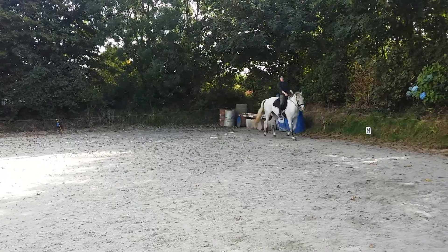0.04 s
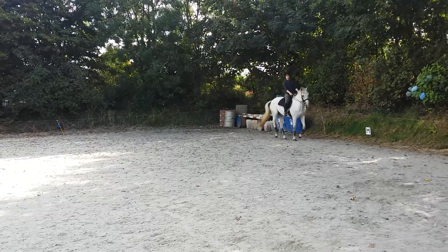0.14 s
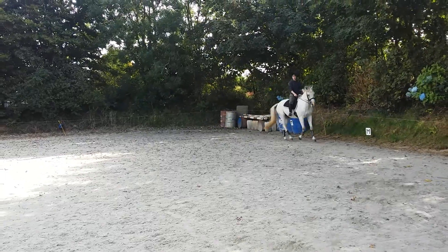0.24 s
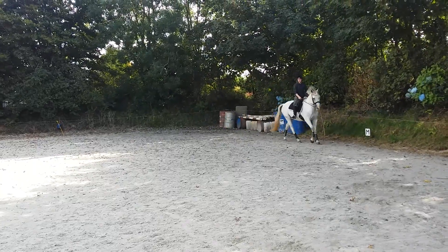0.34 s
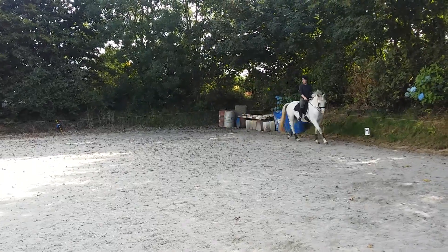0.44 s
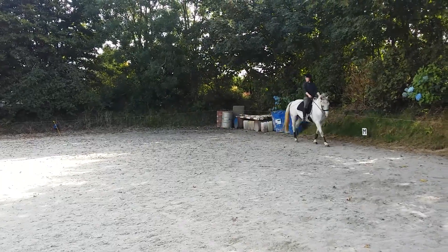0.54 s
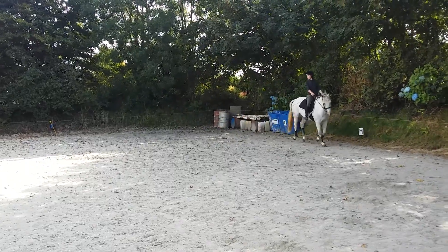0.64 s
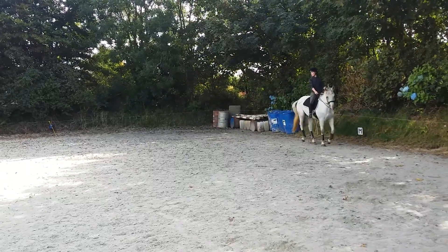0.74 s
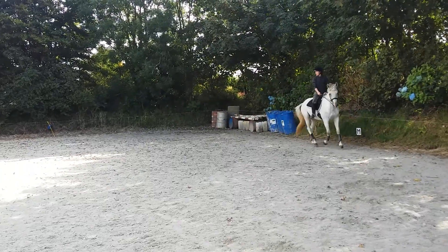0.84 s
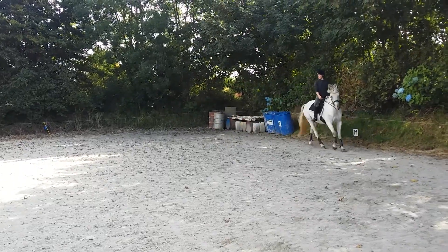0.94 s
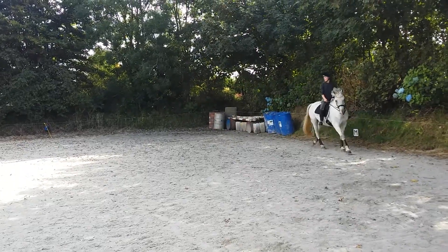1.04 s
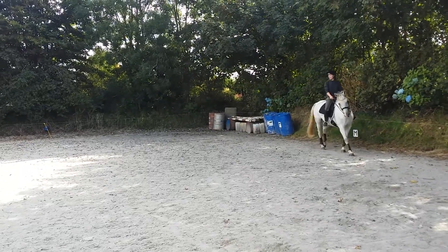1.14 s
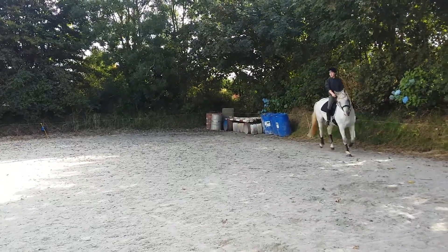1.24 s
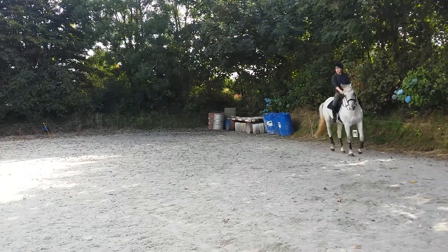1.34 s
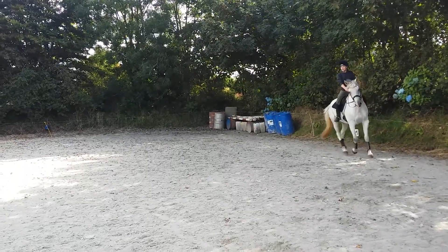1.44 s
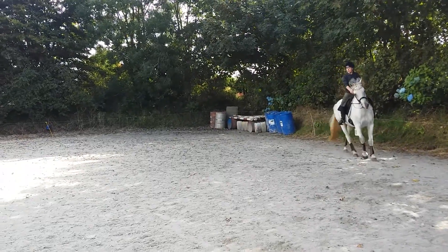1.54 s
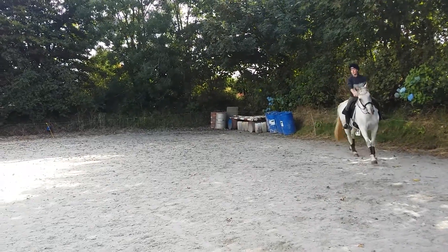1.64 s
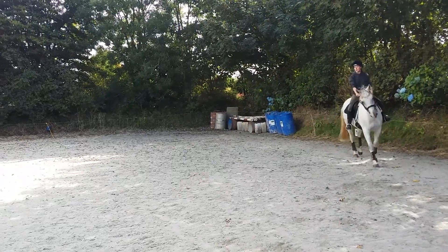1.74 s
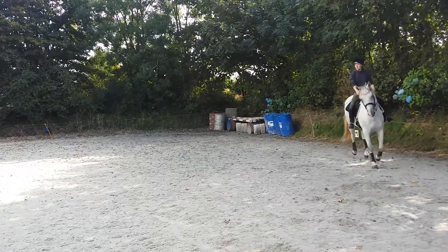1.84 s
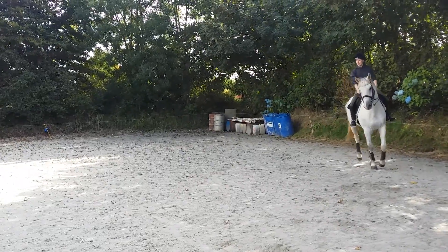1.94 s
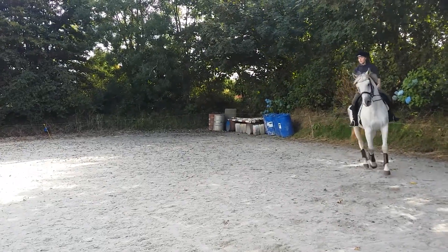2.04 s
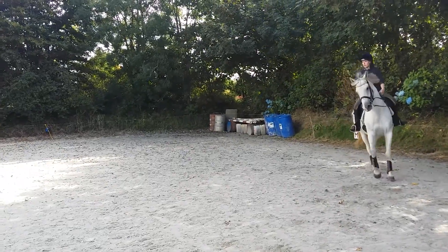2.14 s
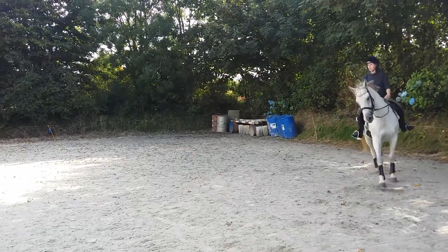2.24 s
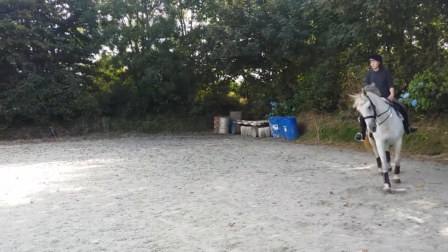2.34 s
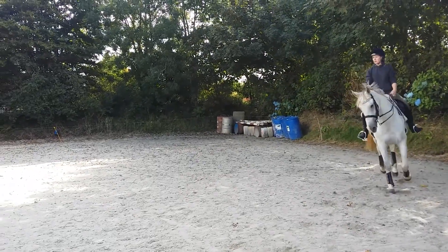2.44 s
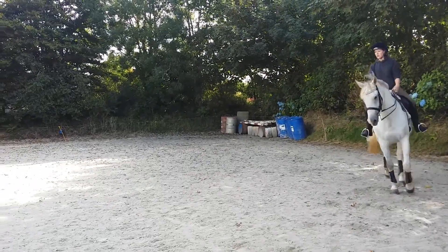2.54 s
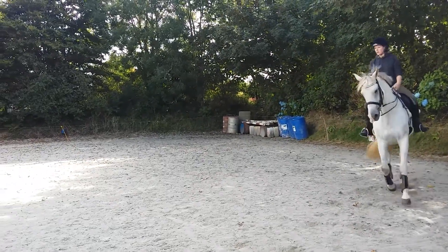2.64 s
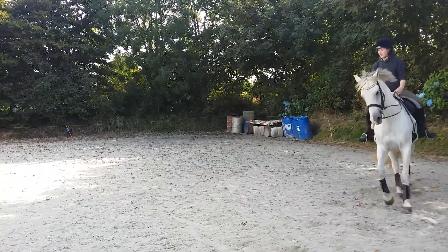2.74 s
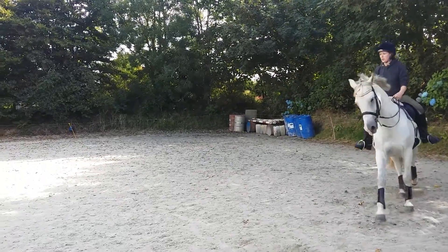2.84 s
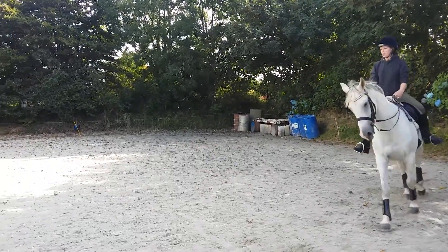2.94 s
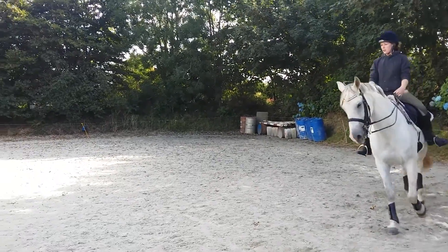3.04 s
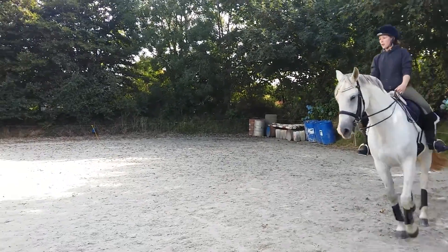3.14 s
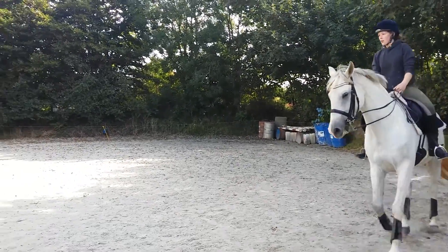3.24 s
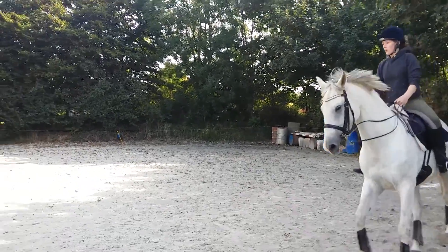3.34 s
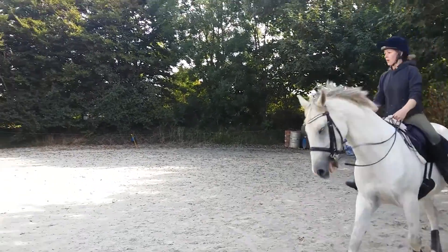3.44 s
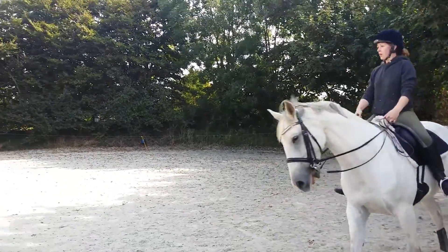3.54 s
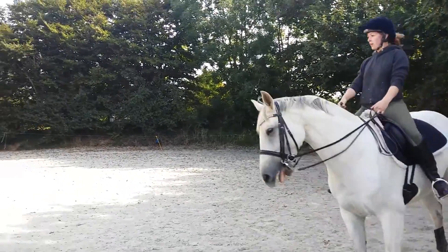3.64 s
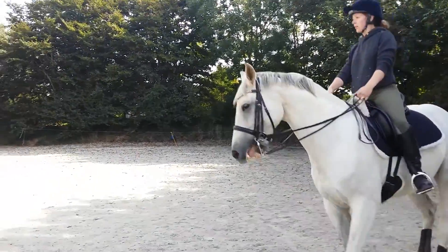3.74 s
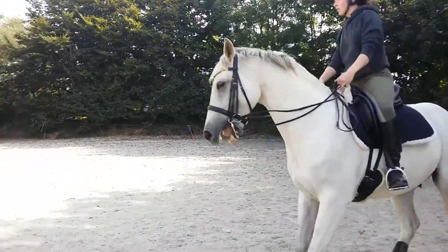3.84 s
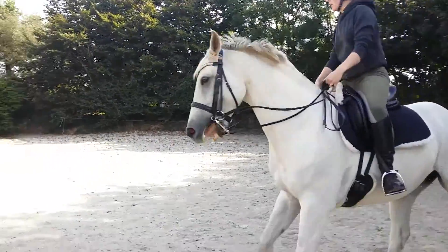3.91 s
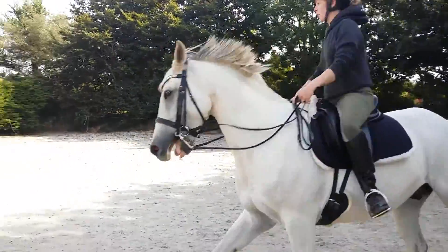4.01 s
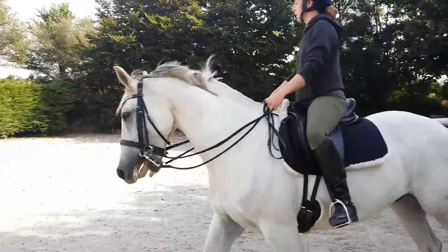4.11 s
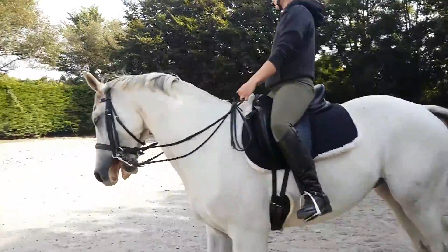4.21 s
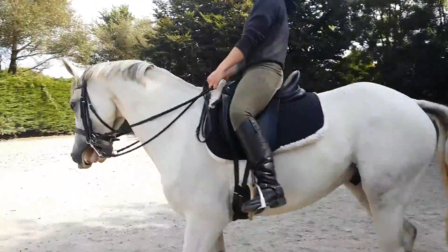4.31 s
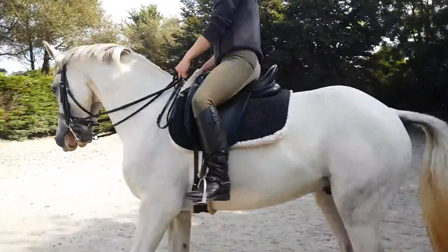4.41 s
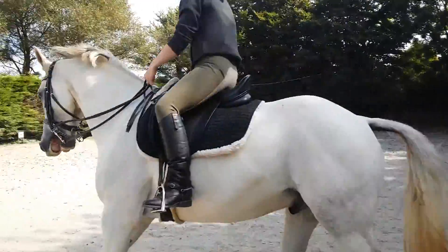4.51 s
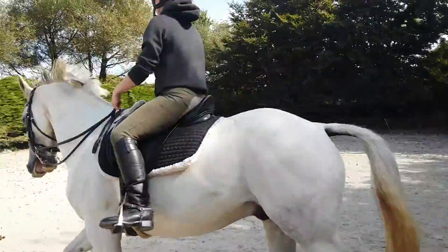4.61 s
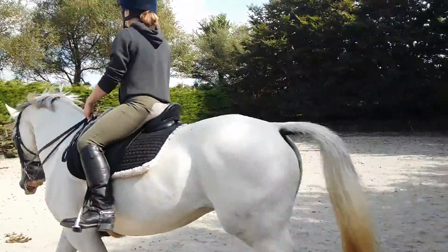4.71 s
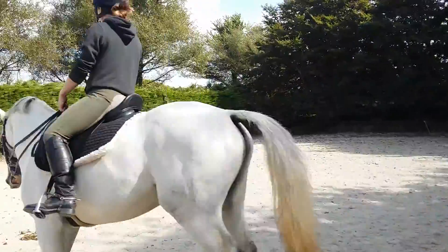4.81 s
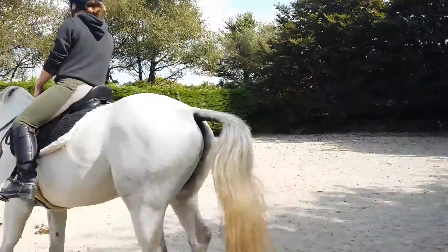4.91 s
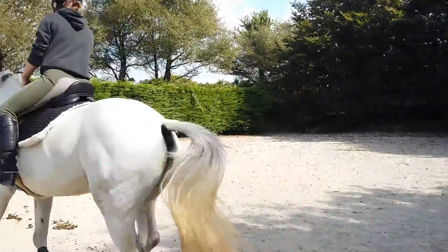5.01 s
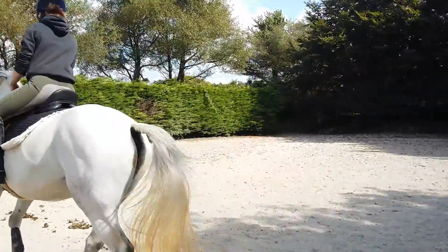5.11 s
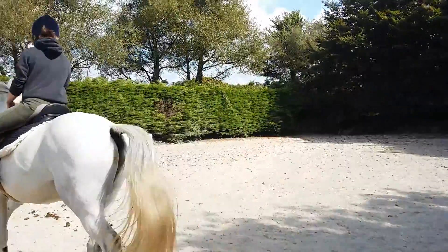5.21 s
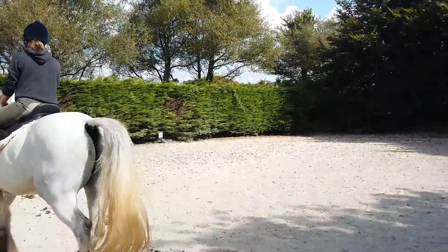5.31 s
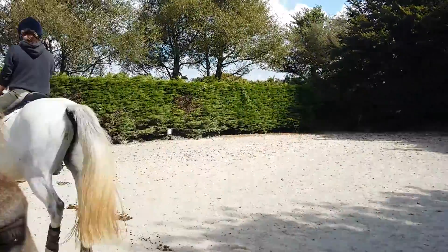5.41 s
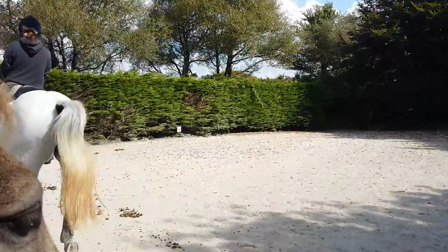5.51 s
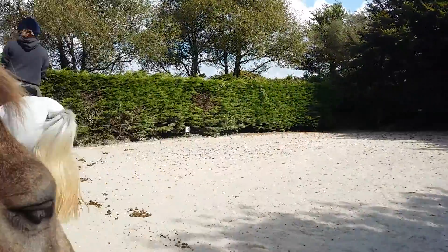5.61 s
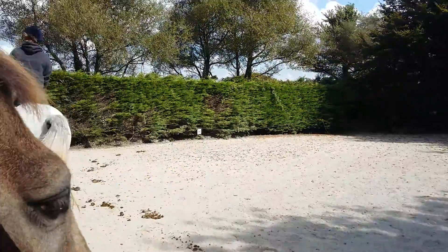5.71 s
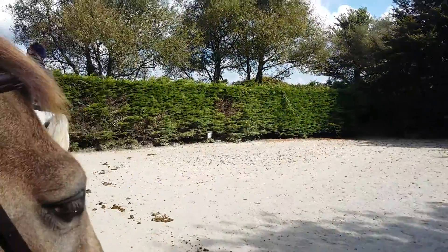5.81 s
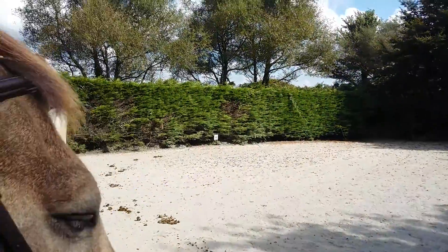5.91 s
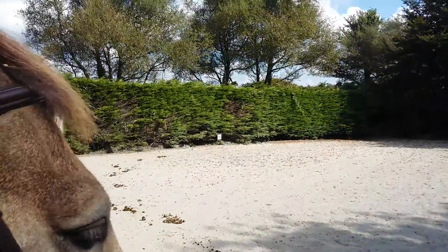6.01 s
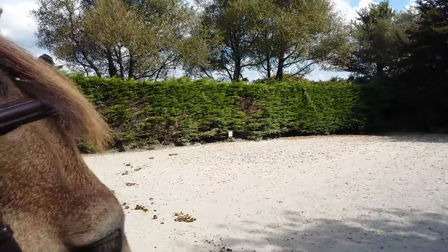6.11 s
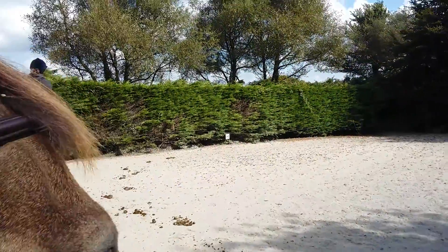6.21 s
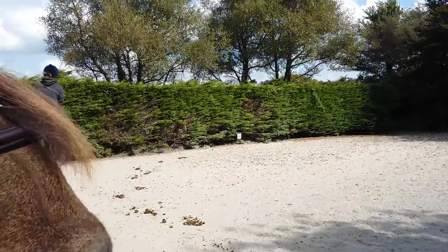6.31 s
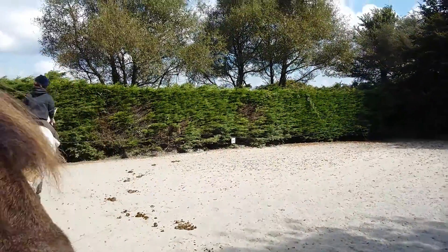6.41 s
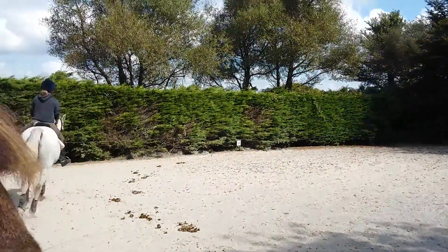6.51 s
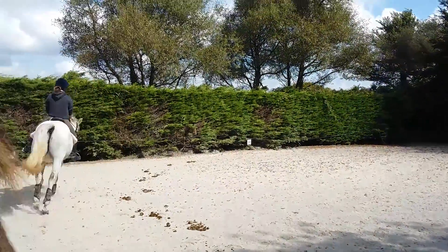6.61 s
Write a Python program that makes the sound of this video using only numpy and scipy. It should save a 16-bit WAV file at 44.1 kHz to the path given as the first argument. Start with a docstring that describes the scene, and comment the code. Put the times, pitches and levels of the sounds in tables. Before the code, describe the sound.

Outdoors on a sand arena ringed by trees, a cantering horse starts faint and distant, its dull hoof thuds and sandy crunches in uneven clusters. It comes steadily nearer, passes very close with hard thumps, spraying grit and small metallic tack ticks, then moves off more softly. Leaves rustle faintly throughout, and wind thumps a small handheld stereo camera's microphones, mostly after the pass.

```python
"""On a sand arena among trees a horse canters up to a small camera and passes it: damped tones make the
hoof thuds, enveloped noise and short damped sines the sand, and clusters of metal modes the tack ticks.
Noise in random patches rustles as leaves; low noise and short low tones are the wind on two microphone
ports. Tables set the levels of blows, crunches and wind; distance also sets the hoof thumps, stray kicks
and the pitch of the clods under crunches and strays."""
import sys
import numpy as np
from scipy import signal
from scipy.fft import rfft, irfft, next_fast_len
from scipy.io import wavfile
from scipy.ndimage import uniform_filter1d, map_coordinates

SR = 44100
rng = np.random.default_rng(int(sys.argv[2]) if len(sys.argv) > 2 else 0)


def wav_record(signal):
    """Record a signal, one row per channel, as 16-bit PCM in the file named by sys.argv[1]."""
    frames = np.transpose(np.atleast_2d(signal))
    bounded = np.clip(frames, -1, 1)
    # unit amplitude maps onto the largest positive 16-bit level
    quanta = np.round(bounded * 32767).astype(np.int16)
    wavfile.write(sys.argv[1], SR, quanta)


N = 293706


def amp(db):
    """Level to amplitude: 20 dB is a factor of ten."""
    return 10 ** (np.asarray(db) / 20)


def unit(x):
    """Normalisation of the whole array to rms 1."""
    return x / np.sqrt(np.mean(x ** 2) + 1e-20)


def along(points, hz):
    """Interpolation of (hz, value) points on a logarithmic frequency axis."""
    point_hz, value = np.transpose(points)
    return np.interp(np.log(hz + 1), np.log(point_hz + 1), value)


def over_time(points):
    """Linear interpolation of (time_s, value) points to one value a sample."""
    return np.interp(np.arange(N) / SR, *np.transpose(points))


def wobble(rate):
    """Random modulation: a smooth curve through normal random knots, rate of them a second."""
    knots = rng.standard_normal(int(N * rate / SR) + 4)
    return map_coordinates(knots, [np.arange(N) * rate / SR])


def filtered(x, response):
    """Linear filtering: the spectrum of x times a response of frequency."""
    m = next_fast_len(N + SR // 4)
    return irfft(rfft(x, m) * response(np.fft.rfftfreq(m, 1 / SR)), m)[..., :N]


def spread(pair, spectrum):
    """Interaural-style coherence: mid and side are weighted so the ports correlate as a wide source."""
    # left-right correlation by frequency: hz, correlation
    likeness = [(60, 0.68), (110, 0.97), (200, 0.9), (380, 0.82), (700, 0.6), (1290, 0.072), (2380, 0.02),
                (4400, 0.17), (8120, 0.01), (15000, 0.0)]

    def mid_side(hz):
        angle = np.arccos(np.clip(along(likeness, hz), -1, 1)) / 2
        return amp(along(spectrum, hz)) * [np.cos(angle), np.sin(angle)]

    mid, side = filtered(pair, mid_side)
    return np.array([mid + side, mid - side]) / np.std(mid)


def grains(spiky_db, rate):
    """Granular noise: two noise streams share a random size that varies from grain to grain."""
    size = amp(spiky_db * wobble(rate))
    return size * rng.standard_normal((2, N))


def patches(depth_db, size, wide, long):
    """Time-frequency modulation: noise gains random patches, wide bins by long frames of an STFT."""
    bins = signal.stft(rng.standard_normal((2, N)), nperseg=size)[2]
    field = rng.standard_normal(bins.shape[1:])
    field = uniform_filter1d(uniform_filter1d(field, wide, 0), long, 1)
    return signal.istft(bins * amp(depth_db * unit(field)), nperseg=size)[1][:, :N]


def swell(s, rise, fall, bend):
    """Transient envelope, 8 dB down rise s before and fall s after its peak; also its start index."""
    t = np.arange(-SR // 8, SR // 5) / SR
    shape = amp(-8 * np.where(t < 0, (np.abs(t) / rise) ** 2.1, (np.abs(t) / fall) ** bend))
    return round(s * SR) + SR - SR // 8, shape  # the buffers begin 1 s early


def metres(s):
    """Source distance, interpolated along the path of the horse."""
    # path past the camera: time_s, distance_m
    path = [(0, 29), (1.5, 16.7), (2.8, 8.8), (3.8, 5.2), (4.5, 4.2), (5.3, 4.4), (6.66, 11.5)]
    return np.interp(s, *np.transpose(path))


def hooves():
    """Impulsive excitation: packed ground rings as a damped tone, and loose sand adds a dull noise puff."""
    # blows on packed sand: peak_s, level_db, ground_hz
    blows = [(0.085, -50.5, 460), (0.35, -49, 117), (0.501, -47, 183), (0.515, -37.5, 230),
             (0.678, -35, 187), (0.944, -45.5, 118), (1.088, -39, 164), (1.096, -38.5, 150),
             (1.114, -41, 156), (1.271, -49.5, 262), (1.523, -43.5, 137), (1.688, -45, 130),
             (1.708, -47.5, 165), (1.863, -44.5, 164), (2.133, -44, 128), (2.282, -33.5, 177),
             (2.314, -37, 217), (2.464, -54, 253), (2.747, -49, 188), (2.875, -38, 199), (2.913, -45, 183),
             (3.07, -32, 173), (3.337, -45, 125), (3.483, -36.5, 166), (3.619, -46, 342), (3.658, -39, 164),
             (3.934, -50, 293), (4.08, -27.5, 206), (4.118, -39, 260), (4.244, -40.5, 262),
             (4.275, -33.5, 186), (4.53, -33.5, 291), (4.679, -25.5, 388), (4.681, -24.5, 579),
             (4.708, -34.5, 207), (4.776, -39, 233), (5.122, -37, 258), (5.28, -29.5, 444),
             (5.311, -36.5, 146), (5.503, -45, 212), (5.722, -36, 391), (5.731, -47, 350),
             (5.928, -36, 355), (6.347, -45, 102), (6.52, -45, 166), (6.545, -41.5, 236)]
    ring_s, ring_shortens = 0.038, 0.31  # t60 of a -39 dB blow; dB of t60 lost a dB of harder blow
    over_least_db, over_scatter_db = -10, 6.5  # overtone: least level, random spread above it
    thump_least_db, thump_scatter_db = -37.5, 5  # thump: least level at 1 m, random spread above it
    puff_db, puff_grows = -50, 0.83  # puff of a -40 dB blow; dB gained a dB of harder blow
    ground, puff = np.zeros((2, N + 2 * SR))
    t = np.arange(SR // 5) / SR
    for (s, db, hz), turn in zip(blows, rng.random((len(blows), 5))):
        t60 = ring_s * amp(-ring_shortens * (db + 39))
        over_db = over_least_db + over_scatter_db * turn[3]
        thump_db = thump_least_db + thump_scatter_db * turn[4] - 20 * np.log10(metres(s))
        push = (1 - np.exp(-(t / 0.0019) ** 2)) * amp(-60 * t / t60)
        # stiffest at first contact, so the pitch sags to ground_hz
        cycles = hz * (t + 0.0011 * (1 - np.exp(-t / 0.002)))
        over_cycles = 1.956 * cycles + 0.73 * turn[0] + 0.18 * turn[1]
        over = amp(over_db - 60 * t / 0.033) * np.sin(2 * np.pi * over_cycles)
        ring = push * (np.sin(2 * np.pi * (cycles + 0.34 * turn[0])) + over)
        ring = 1.385 * ring / np.abs(ring).max()
        # the weight follows through
        thump = (t / 0.011) * np.exp(1 - t / 0.013) * np.sin(2 * np.pi * (55 + 55 * turn[2]) * t)
        start = round((s - .003) * SR) + SR
        ground[start:][:len(t)] += amp(db + 2) * ring + amp(thump_db) * thump
        at, shape = swell(s + 0.005, 0.0085, 0.43 * t60, bend=0.74)
        puff[at:][:len(shape)] += amp(puff_db + puff_grows * (db + 40)) * shape
    dull = [(70, -7), (130, 12), (300, -2.5), (800, -17.5), (1500, -58.5)]  # hz, level_db
    return ground[SR:][:N] + puff[SR:][:N] * spread(grains(4.2, rate=180), dull)


def sand():
    """Granular friction: fine grains hiss in blotches, coarse ones scrape lower, clods and grit crack."""
    # spectra of fine grains, coarse grains and bright spray: hz, level_db (per Hz)
    fine_spectrum = [(900, -37), (1500, 1.5), (2300, -2), (3500, -0.5), (4700, -1.5), (5400, -12),
                     (6400, -26.5), (8500, -45), (15500, -60)]
    coarse_spectrum = [(100, -9), (250, 0.5), (550, -4.5), (1000, -1), (1400, -8.5), (2200, -54)]
    spray_spectrum = [(4500, -25), (5800, 0.5), (7000, -8), (9000, -11), (15500, -28)]
    fine_power, coarse_power = np.zeros((2, N + 2 * SR))
    lumps = np.zeros((2, N + 2 * SR))
    rows = kicks()
    for (s, db, rise, fall, coarse_db, hz), draw in zip(rows, rng.random((len(rows), 3, 4, 14))):
        at, shape = swell(s, rise, fall, bend=1.67)
        fine_power[at:][:len(shape)] += (amp(db - 3.5) * shape) ** 2
        coarse_power[at:][:len(shape)] += (amp(db + coarse_db - 3.0) * shape) ** 2
        clod = clods(pitch_hz=hz, shape=shape, draw=draw[0])
        clod_pair = np.array([clod, np.roll(clod, shift=5)])  # reaches the right port 5 samples later
        # each port hears its own grit
        grit = np.array([clods(pitch_hz=3760, shape=shape, draw=d) for d in draw[1:]])
        lumps[:, at:at + len(shape)] += amp(db + coarse_db - 6.5) * clod_pair + amp(db - 9) * grit
    fine_power, coarse_power = fine_power[SR:][:N], coarse_power[SR:][:N]
    blotchy = amp(2.46 * wobble(400)) * patches(3.9, size=256, wide=4, long=3)
    hiss = np.sqrt(fine_power) * spread(blotchy, fine_spectrum)
    # the steeper exponent favours strong kicks
    spray = amp(-6) * fine_power ** 0.72 * spread(grains(2.8, rate=450), spray_spectrum)
    scrape = np.sqrt(coarse_power) * spread(grains(2.4, rate=230), coarse_spectrum)
    return hiss + spray + scrape + lumps[:, SR:][:, :N]


def kicks():
    """Asymmetric transients: (s, dB, rise s, fall s, coarse dB, clod Hz) of crunches, strays and scuffs."""
    # a hoof cuts in at once, the sand settles: peak_s, level_db, fall_s, coarse_over_fine_db
    crunches = [(0.331, -50.5, 0.029, -0.5), (0.499, -56, 0.013, 7), (0.681, -55.5, 0.0072, 5.5),
                (0.735, -55, 0.03, -0.5), (0.935, -49.5, 0.031, -0.5), (1.09, -51.5, 0.016, 2),
                (1.356, -52.5, 0.017, -10), (1.512, -49, 0.032, -0.5), (1.678, -48, 0.027, 0.5),
                (1.862, -51.5, 0.014, 5.5), (2.125, -49.5, 0.027, 1.5), (2.281, -46.5, 0.013, 3),
                (2.659, -54.5, 0.014, -18), (2.875, -45, 0.013, -1.5), (2.906, -52.5, 0.014, 8),
                (3.006, -55.5, 0.047, 4), (3.07, -42.5, 0.013, -3.5), (3.113, -52, 0.043, 2),
                (3.294, -57, 0.01, 5.5), (3.51, -47.5, 0.034, 0.5), (3.61, -51.5, 0.056, 4),
                (4.02, -61, 0.009, -8), (4.076, -33, 0.013, -2), (4.215, -49, 0.074, 5),
                (4.451, -41, 0.007, -14), (4.674, -40, 0.016, 3), (4.707, -39.5, 0.0094, 4),
                (4.798, -48.5, 0.007, -7), (4.88, -43, 0.055, -7.5), (5.109, -51, 0.0087, 2.5),
                (5.316, -46.5, 0.051, -1.5), (5.412, -49, 0.005, -8), (5.92, -52, 0.02, 6),
                (6.097, -52, 0.007, 6.5), (6.15, -55.5, 0.013, 11.5), (6.343, -47, 0.014, 5),
                (6.504, -52, 0.0081, 9.5), (6.613, -47, 0.006, -0.5)]
    # a hoof ploughs up sand and pulls clear: peak_s, level_db, rise_s, coarse_over_fine_db, clod_hz
    scuffs = [(0.525, -56, 0.031, 4, 564), (1.113, -52, 0.022, 2, 567), (1.273, -52.5, 0.021, 0, 980),
              (2.317, -50.5, 0.022, -1, 650), (2.345, -54, 0.04, -4, 1070), (2.462, -54, 0.048, 3, 750),
              (2.513, -52, 0.022, 0, 764), (2.744, -50.5, 0.03, 2, 617), (3.161, -51.5, 0.042, -5, 1700),
              (3.187, -46, 0.0098, 4, 1270), (3.215, -55, 0.018, 1, 1400), (3.324, -45, 0.011, -4, 1670),
              (3.481, -40.5, 0.01, -4.5, 1300), (3.671, -41, 0.015, -3, 1560),
              (3.708, -42.5, 0.011, -0.5, 940), (3.926, -39, 0.012, -3, 1390),
              (4.114, -37, 0.021, -4.5, 1550), (4.287, -49.5, 0.049, 2, 1700),
              (4.324, -37, 0.022, -9, 1690), (4.53, -32.5, 0.011, -5.5, 1500),
              (4.722, -36, 0.008, -2.5, 990), (4.765, -42, 0.024, -4, 880), (4.899, -43, 0.023, -3, 1020),
              (4.917, -46.5, 0.0078, 9, 1000), (4.938, -44.5, 0.011, 4.5, 990),
              (5.125, -41.5, 0.021, 1, 1500), (5.279, -44, 0.00895, 7.5, 550),
              (5.518, -50.5, 0.024, 2.5, 1040), (5.733, -49, 0.017, 4, 544), (6.542, -55, 0.016, 8, 1700)]
    cut_in_s, deep_s, pull_clear_s = .003, .04, .012  # least rise; fall that doubles it; fall of a scuff
    stray_db, stray_fall_s, stray_count = -41.5, 0.013, 14  # small kicks: least level at 1 m
    clod_far_hz, clod_near_hz = 520, 2290  # pitch far away; what is added at 1 m
    clod_dulls = 0.049  # natural-log pitch lost a dB of coarseness

    def clod_hz(s, coarse_db):
        return (clod_far_hz + clod_near_hz / metres(s)) * np.exp(-clod_dulls * coarse_db)

    strays = []
    for a, b, c, d in rng.random((stray_count, 4)):
        s = a * N / SR
        db = stray_db - 20 * np.log10(metres(s)) + 5 * b
        strays.append((s, db, cut_in_s + .02 * c, stray_fall_s, 10 * d - 4))
    cuts = [(s, db, cut_in_s * (1 + (fall / deep_s) ** 3), fall, coarse_db)
            for s, db, fall, coarse_db in crunches]
    return ([(*row, clod_hz(row[0], row[-1])) for row in cuts + strays]
            + [(s, db, rise, pull_clear_s, coarse_db, hz) for s, db, rise, coarse_db, hz in scuffs])


def clods(pitch_hz, shape, draw):
    """Fracture of small lumps: damped sines of a few cycles, scattered in time and round the pitch."""
    t = np.arange(SR // 40) / SR
    starts = np.searchsorted(np.cumsum(shape) / shape.sum(), draw[0])  # denser where the crunch is strong
    hz = pitch_hz * np.exp(0.24 * (draw[1] + draw[2] - 1))[:, None]
    decay = amp(16 * draw[3][:, None] - 60 * t * hz / 14)  # 60 dB in 14 cycles
    waves = decay * np.sin(2 * np.pi * hz * t) * (1 - np.exp(-t * hz))
    places = starts[:, None] + np.arange(len(t))
    out = np.bincount(places.ravel(), waves.ravel(), len(shape) + len(t))[:len(shape)]
    return out * np.linalg.norm(shape) / np.linalg.norm(out)


def tack():
    """Modal synthesis: metal parts tick as a sum of modes with wandering phase, plus a bright noise spit."""
    # ticks: start_s, level_db, low_modes_db, sparkle_db (over the level), length_s
    ticks = [(3.7718, -30, 0, -42, 0.0069), (3.829, -32, -22, -33, 0.0049), (3.889, -44.5, 2, -33, 0.023),
             (4.0409, -27.5, -1.5, -25, 0.0085), (4.43, -38, -7, -25.5, 0.011),
             (4.658, -34.5, 5, -30, 0.0062), (4.994, -44.5, -10, -24, 0.0076),
             (5.027, -37, -9, -18.5, 0.0084), (5.234, -56, -2, -12, 0.007)]
    # buckle and bit modes: mode_hz, level_db
    modes = [(1900, -13), (2400, -1), (2900, -1), (3350, 1.5), (4000, -2.5), (4500, 0), (5100, 2.5),
             (5700, -11), (6400, -13)]
    # spectrum of the spit: hz, level_db (per Hz)
    spit_spectrum = [(5000, -30), (7000, 3), (10000, 0), (15500, -15)]
    out, spit = np.zeros((2, N)), np.zeros(N)
    t = np.arange(SR // 20) / SR
    hz, mode_db = np.transpose(modes)[:, :, None]
    # contacts keep shifting the phase, in cycles
    jolts = np.cumsum(rng.standard_normal((len(ticks), len(modes), len(t))), axis=2) * 0.012
    draws = rng.random((len(ticks), 3, len(modes), 1))
    for (s, db, low_db, sparkle_db, length), draw, jolt in zip(ticks, draws, jolts):
        shape = (1 - np.exp(-t / 0.0014)) * np.exp(-(t / (0.9 * length)) ** 3)
        gain = amp(mode_db + low_db * (hz < 3200) + 4.6 * draw[0])
        # each port has its own starting phases
        ring = shape * np.sum(gain * np.sin(2 * np.pi * (hz * t + jolt + draw[1:])), axis=1)
        at = round(s * SR)
        out[:, at:at + len(t)] += amp(db - 5) * ring * np.linalg.norm(shape) / np.linalg.norm(ring.mean(0))
        spit[at:at + len(t)] += amp(db + sparkle_db - 1.0) * shape
    return out + spit * spread(rng.standard_normal((2, N)), spit_spectrum)


def trees():
    """Wind-excited foliage: many small contacts sum to noise, in faint patches over a low rush."""
    # strength of the leaves: time_s, level_db
    air = [(0, -59), (0.98, -60), (1.3, -56.5), (2.2, -58.5), (3.08, -56), (3.97, -54.5), (4.21, -49.5),
           (4.4, -53.5), (5.1, -54.5), (6.4, -55), (6.66, -53.5)]
    # spectra of the leaves and of the rush: hz, level_db (per Hz)
    leaf_spectrum = [(530, -12.5), (900, -1), (1170, -5), (1520, -3), (2280, -7.5), (2600, -5),
                     (2970, -5.5), (4620, -3.5), (4930, -5.5), (6060, -19.5), (8500, -35), (15500, -53)]
    rush_spectrum = [(60, -28), (110, -0.5), (170, 0), (400, -3), (1000, -16.5), (1500, -43)]
    air_db = over_time(air)
    leaf_noise = spread(patches(1.33, size=512, wide=6, long=12), leaf_spectrum)
    leaves = amp(air_db - 0.5 + 0.82 * wobble(9.8)) * leaf_noise
    rush = amp(air_db + 0.5 + 1.17 * wobble(12)) * spread(grains(2.0, rate=60), rush_spectrum)
    return leaves + rush


def buffet():
    """Turbulent pressure: rumble common to both ports, eddies of each port alone, and thumps on one port."""
    # wind strength: time_s, rumble_db
    wind = [(0, -62), (0.4, -67.5), (0.9, -66.5), (1.3, -67.5), (3.0, -60), (3.8, -64.5), (4.13, -53.5),
            (4.5, -63.5), (5.1, -52.5), (5.6, -62), (6.1, -59.5), (6.42, -58), (6.66, -63)]
    # spectrum of rumble and eddies: hz, level_db (per Hz)
    rumble_spectrum = [(25, -50), (40, -7), (55, 6), (75, 5), (110, -1.5), (200, -12.5), (400, -50.5)]
    # strong thumps on one port: peak_s, level_db, pitch_hz
    pops = [(3.904, -44, 109), (4.913, -37, 93), (5.066, -31.5, 89), (5.172, -34.5, 104), (5.238, -41, 103),
            (5.305, -38, 92), (5.359, -33, 80), (5.407, -36, 119), (5.458, -35.5, 95), (5.513, -37.5, 75),
            (5.553, -41.5, 85), (5.943, -40.5, 75), (6.058, -39.5, 75), (6.45, -43, 86), (6.524, -36, 75),
            (6.575, -45, 75), (6.619, -40, 90.5)]
    eddy_db, pop_s = -4, 0.035  # eddies over shared rumble; width of a thump between its 1/e points
    right_from_s, right_to_s = 3.8, 4.7  # thumps strike the right port in this span, else the left
    weak_from_s, weak_to_s, weak_count, weak_db = 4.7, 6.4, 22, -50  # weak thumps, least level
    weak_hz = (75, 145)  # their pitch on the left and right port, before random scatter
    gusty = amp(2.4 * wobble(20)) * rng.standard_normal((3, N))
    shared, *own = unit(filtered(gusty, lambda hz: amp(along(rumble_spectrum, hz))))
    rumble = amp(over_time(wind) + 2.0) * (shared + amp(eddy_db) * np.array(own))
    out = np.pad(rumble, ((0, 0), (0, SR)))
    t = np.arange(-SR // 20, SR // 20) / SR

    def port(s):
        return int(right_from_s < s < right_to_s)

    slots = np.linspace(weak_from_s, weak_to_s, weak_count)
    weak = [(s + 0.0615 * a, weak_db + 6 * b, weak_hz[port(s)] * (0.86 + 0.32 * c))
            for s, (a, b, c) in zip(slots, rng.random((weak_count, 3)))]
    for (s, db, hz), turn in zip(pops + weak, rng.random((len(pops) + weak_count, 2))):
        wave = np.sin(2 * np.pi * (hz * t + turn[0])) + 0.41 * np.sin(2 * np.pi * (1.8 * hz * t + turn[1]))
        bell = np.exp(-(t / (.5 * pop_s)) ** 2)
        out[port(s), round(s * SR) - SR // 20:][:len(t)] += amp(db) * bell * wave
    return out[:, :N]


def scene():
    """Superposition: horse and trees pass the unequal colour of the ports, then wind on them is added."""
    # difference in colour of the two ports: hz, left_over_right_db
    tilt = [(60, 0), (110, 0), (200, 0), (380, -1), (700, 0), (1290, -2), (2380, -4), (4400, 3.5),
            (8120, 6), (15000, -2)]
    far = hooves() + sand() + tack() + trees()
    return filtered(far, lambda hz: amp(np.array([along(tilt, hz), -along(tilt, hz)]) / 2)) + buffet()


def record(dry):
    """Self-noise and band limiting: the camera adds faint hiss, cuts the deepest bass and the extreme top."""
    # spectrum of the hiss: hz, level_db (per Hz)
    hiss_spectrum = [(100, 4), (8000, -7), (15500, -6)]
    top_hz = 15800
    noise = rng.standard_normal(dry.shape)
    hiss = amp(-84.0) * unit(filtered(noise, lambda hz: amp(along(hiss_spectrum, hz))))
    return filtered(dry + hiss, lambda hz: (hz < top_hz) / (1 + (38 / (hz + 1)) ** 5))


dry = scene()
out = record(dry)
wav_record(out)
```